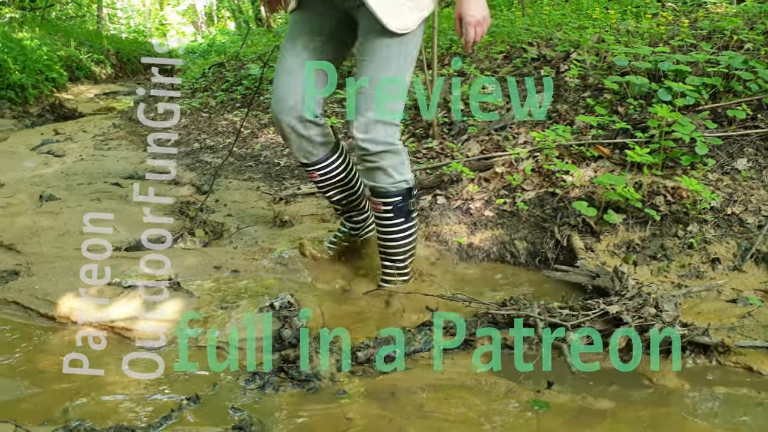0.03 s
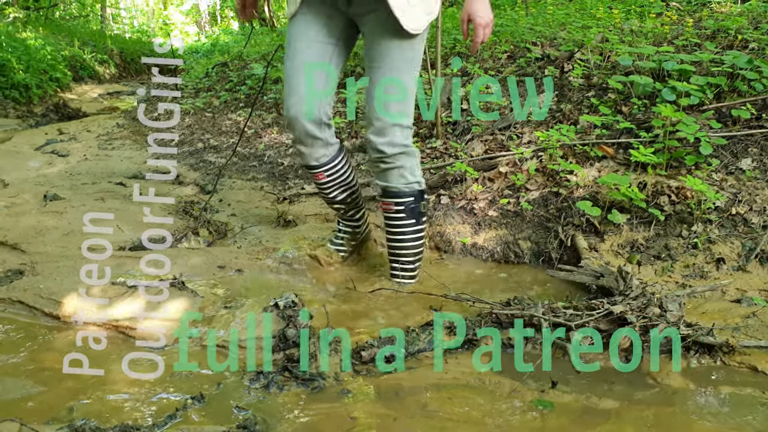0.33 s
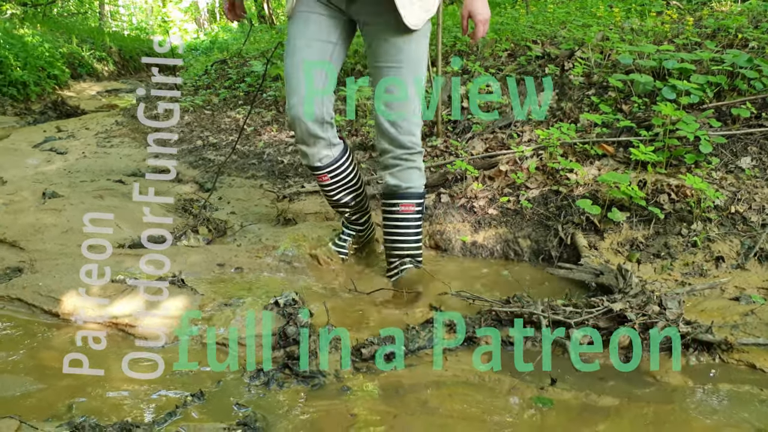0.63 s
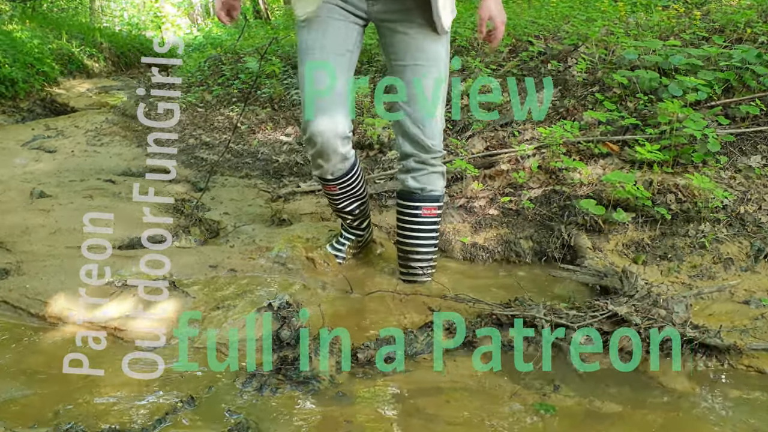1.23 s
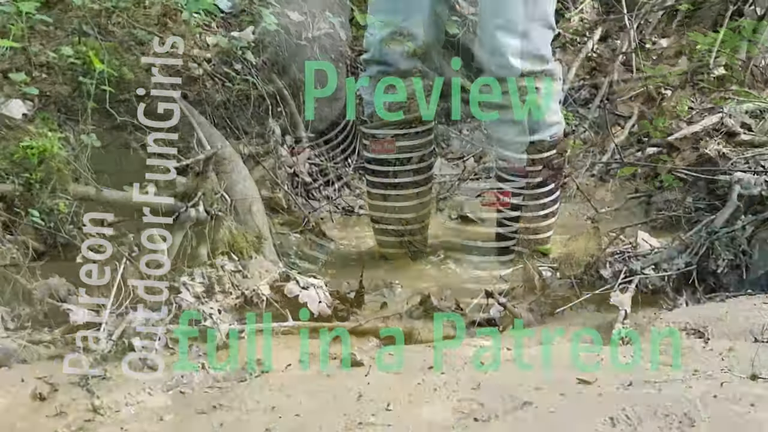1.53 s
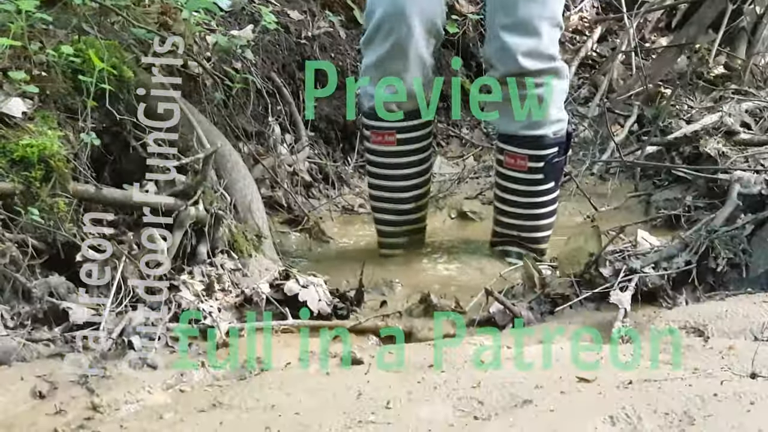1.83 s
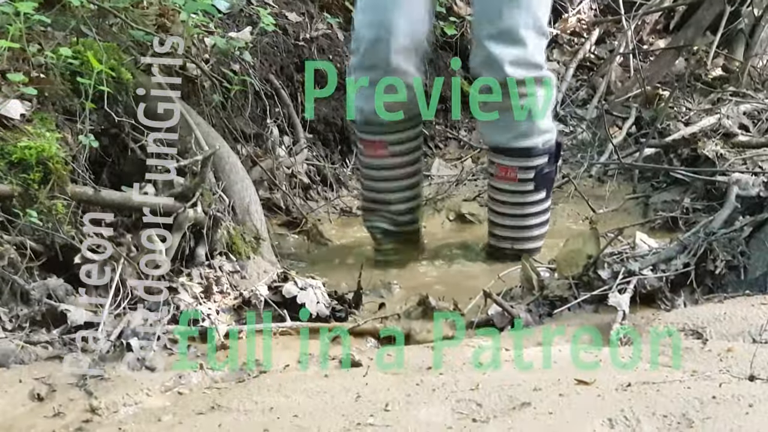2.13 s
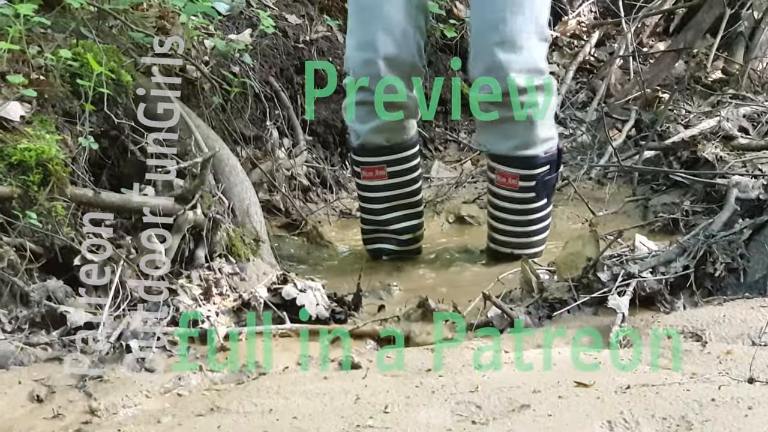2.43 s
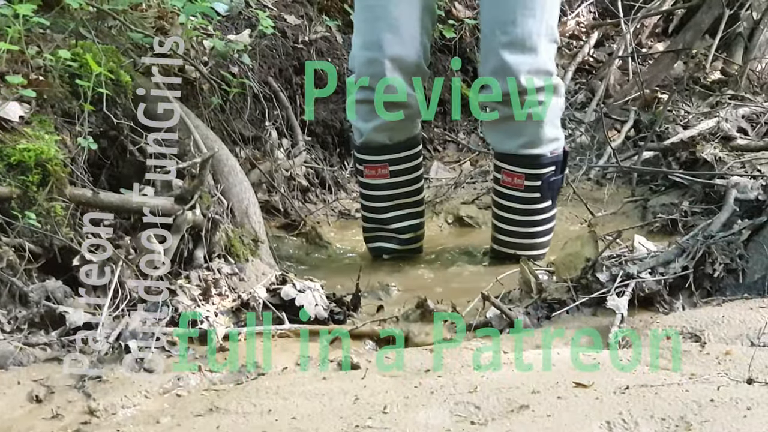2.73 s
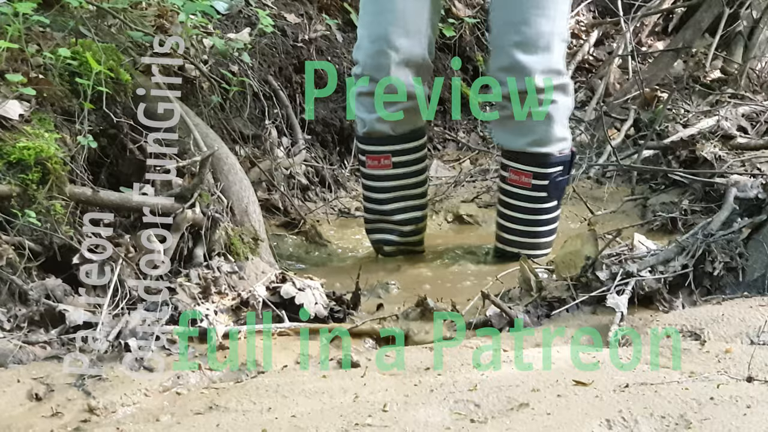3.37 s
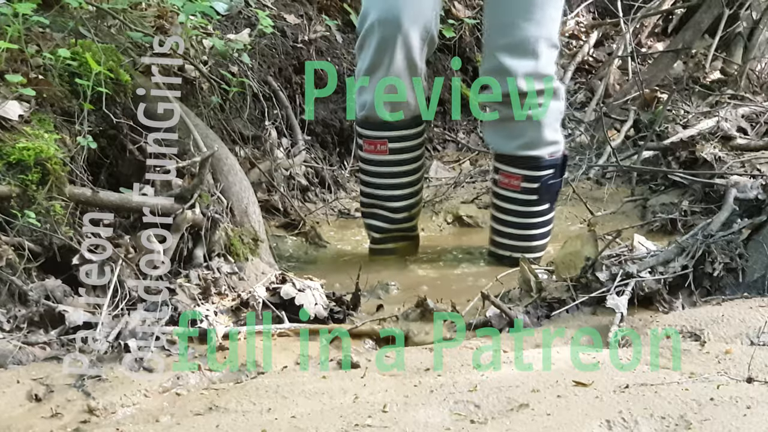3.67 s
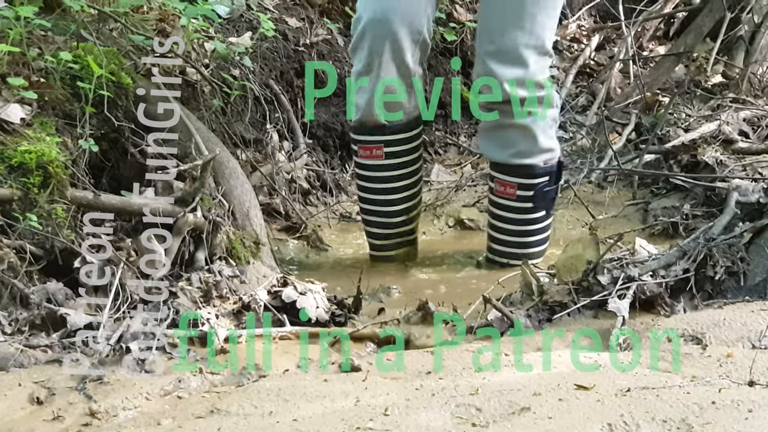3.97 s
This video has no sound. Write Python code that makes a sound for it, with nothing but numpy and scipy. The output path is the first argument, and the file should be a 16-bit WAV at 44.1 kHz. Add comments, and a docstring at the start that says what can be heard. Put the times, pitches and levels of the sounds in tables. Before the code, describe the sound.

Small splashes, bubbles and a drip come from boots stirring shallow water nearby on the left, over a distant engine. Halfway through, the sound cuts to a low wash of traffic, with faint birdsong echoing in the woods.

```python
"""Rubber boots shift in a shallow muddy stream, close on the left: small splashes of droplets,
ticks of spray, ringing bubbles and one drip. A far engine drones and sinks in pitch over outdoor rumble.
At 1.6 s a click and a cut lead to a second spot by the stream: distant traffic, a faint trilling bird
blurred by the wood's echo, and a soft low thud."""
import sys
import numpy as np
from scipy import signal
from scipy.fft import rfft, irfft
from scipy.io import wavfile

SR = 44100
rng = np.random.default_rng(int(sys.argv[2]) if len(sys.argv) > 2 else 0)


def unload_audio(sound):
    """Save the sound as a 16-bit wav file, at the path given as the first command line argument."""
    columns = np.transpose(np.atleast_2d(sound))
    # keep every value between -1 and 1, then stretch to whole-number steps
    steps = np.round(np.clip(columns, -1, 1) * 32767)
    wavfile.write(sys.argv[1], SR, steps.astype(np.int16))


N = 176400
T, FREQ = np.arange(N) / SR, np.maximum(np.arange(N // 2 + 1) * SR / N, 1)


def undb(db):
    """Decibels to gain."""
    return 10 ** (np.asarray(db) / 20)


def curve(rows, column=1):
    """One table column, linear in time."""
    rows = np.array(rows)
    return np.interp(T, rows[:, 0], rows[:, column])


def over_hz(rows):
    """Table columns interpolated over log frequency."""
    rows = np.array(rows, float)
    return [np.interp(np.log(FREQ), np.log(rows[:, 0]), col) for col in rows.T[1:]]


def band(hz, width_oct):
    """Gaussian band gain over log frequency."""
    return np.exp(-.5 * (np.log2(FREQ / hz) / width_oct) ** 2)


def unit(x):
    """Scale to rms 1."""
    return x / (np.std(x) + 1e-12)


def walk(rate_hz):
    """Smooth random drift, rms 1."""
    return unit(irfft(rfft(rng.standard_normal(N)) * np.exp(-(FREQ / rate_hz) ** 2), N))


def place(x, pan_db):
    """Pan by left minus right dB; the nearer channel keeps the level."""
    return x * undb([[min(pan_db, 0)], [min(-pan_db, 0)]])


def bass_place(x, pan_db=7):
    """Low sound: in phase on both sides, stronger on the left."""
    gains = undb([[pan_db], [0]])
    return x * gains / gains.mean()


def field(rows):
    """Diffuse, partly coherent stereo noise. Each row: Hz, left and right density in dB re 1/Hz."""
    # Each row: frequency in Hz, left-right coherence 0-1, lag of the left in radians.
    coherence = [(60, 0.77, -0.24), (250, 0.87, -0.63), (600, 0.46, 0.56), (880, .15, 1), (1100, 0.2, 3),
                 (1330, 0.46, 3.5), (2000, 0, 0.5), (4000, 0.4, 18)]
    alike, lag = over_hz(coherence)
    left_db, right_db = over_hz(rows)
    left, independent = rfft(rng.standard_normal((2, N))) * np.sqrt(SR / 2)
    right = alike * np.exp(1j * lag) * left + np.sqrt(1 - alike ** 2) * independent
    return irfft(np.array([left * undb(left_db), right * undb(right_db)]), N)


def ring(start_s, hz, ring_s, glide_per_s=1.1):
    """Damped tone that peaks after ring_s and may glide up."""
    age = np.maximum(T - start_s, 0)
    envelope = age / ring_s * np.exp(1 - age / ring_s)
    return envelope * np.sin(2 * np.pi * hz * age * (1 + glide_per_s * age / 2))


def tick(start_s, db, hz, width_oct, decay_s, pan_db):
    """Short noise burst in one band."""
    burst = rng.standard_normal(N) * (T >= start_s) * np.exp(-np.clip((T - start_s) / decay_s, 0, 50))
    burst = irfft(rfft(burst) * band(hz, width_oct), N)
    return place(burst / np.abs(burst).max() * undb(db), pan_db)


def echo(x, t60_s):
    """Diffuse tail of unit energy, different on each side."""
    tail = rng.standard_normal((2, N)) * undb(-60 * T / t60_s)
    tail /= np.sqrt(np.sum(tail ** 2, axis=1, keepdims=True))
    return signal.fftconvolve(np.broadcast_to(x, (2, N)), tail, axes=1)[:, :N]


def hiss():
    """Faint steady treble hiss."""
    # Each row: frequency in Hz, left and right density in dB.
    density = [(2000, -125, -125), (5840, -122, -124), (7500, -132, -132), (9300, -130, -130),
               (11500, -120, -120.5), (15500, -119, -119.5)]
    return field(density)


def rumble():
    """Outdoor rumble; the rush above about 250 Hz dies down."""
    # Each row: frequency in Hz, left and right density in dB.
    density = [(20, -86, -84.5), (32, -71.5, -77.5), (48, -56, -62), (70, -53.5, -62), (118, -58, -65),
               (212, -65, -73), (296, -73.5, -81), (450, -70, -79), (606, -69, -78), (950, -70.5, -80),
               (1395, -75.5, -83), (1880, -80.5, -88.5), (2640, -90, -100), (3650, -97.5, -117),
               (4970, -113, -128), (7000, -128, -138)]
    # Each row: time in seconds, gain of the rush in dB.
    rush_db = [(0, 4), (.22, 5), (.4, 1.5), (.6, 1), (.78, 0.5), (1.0, 1), (1.3, -0.5), (1.6, -0.5)]
    air = field(density)
    bass = irfft(rfft(air) / (1 + (FREQ / 250) ** 4), N)
    return bass + (air - bass) * undb(curve(rush_db) + .98 * walk(8.2))


def traffic():
    """Distant traffic: a gently wavering wash of noise."""
    # Each row: frequency in Hz, left and right density in dB.
    density = [(20.1, -83, -90), (32, -83, -86), (47.4, -59.5, -63.5), (69.4, -55, -63), (105.5, -64, -71),
               (171, -71, -79.5), (340, -80.5, -90), (504, -77.5, -90), (683, -74, -83.5),
               (930, -67.5, -76), (1412, -74.5, -80.5), (1917, -82, -91), (2580, -92, -104),
               (3420, -107, -119), (4700, -117, -130), (6780, -130, -140)]
    return field(density) * undb(.5 * walk(5.9))


def rustle():
    """Thin steady noise of leaves and water."""
    # Each row: frequency in Hz, left and right density in dB.
    density = [(2500, -126, -138), (3800, -116, -132), (4730, -115, -132), (6040, -111, -127),
               (6700, -128, -140)]
    return field(density)


def drones(fade_s=.1, waver_db=3):
    """Wavering tones that come and go within the rumble."""
    # Each row: start and end in seconds, pitch in Hz, level in dB.
    tones = [(-.1, 0.452, 50.5, -43), (-.1, 0.86, 76.5, -40.5), (0, .38, 408.6, -53),
             (.95, 1.67, 80.95, -36), (1.173, 1.692, 392.5, -51.5), (1.9, 2.95, 83.9, -44.5),
             (2.703, 3.45, 59, -45)]
    total = 0
    for start_s, end_s, hz, db in tones:
        fade = np.clip(np.minimum(T - start_s, end_s - T) / fade_s, 0, 1)
        gain = fade * undb(db + waver_db * walk(6.6))
        phase = 2 * np.pi * np.cumsum(hz * (1 + .01 * walk(4.85))) / SR
        total += gain * np.sqrt(2) * np.sin(phase)
    return bass_place(total)


def engine():
    """Harmonics of a far engine, each fading on its own way through the air."""
    # Each row: time in seconds, firing rate in Hz.
    firing_hz = [(0, 51.24), (.35, 50.9), (.6, 50.06), (.8, 49.0), (1.0, 48.9), (1.3, 48.0), (1.6, 47.18)]
    # Each row: time in seconds, levels of harmonics 2 to 6 in dB.
    harmonic_db = [(0, -32, -41, -51, -63, -66), (.2, -30, -48, -49.5, -60, -59),
                   (.42, -28.5, -56, -49, -56, -63), (.78, -32, -42, -46, -56.5, -67),
                   (.87, -37, -34.5, -44.5, -52, -64.5), (1.12, -31, -35, -57.5, -52.5, -60.5),
                   (1.35, -37, -39.5, -45, -48, -51), (1.6, -33.5, -37, -53, -47, -59)]
    phase = 2 * np.pi * np.cumsum(curve(firing_hz) * (1 + .004 * walk(12))) / SR
    total = 0
    for order in range(2, 7):
        gain = undb(curve(harmonic_db, column=order - 1) + 1.08 * walk(8.8))
        total += gain * np.sqrt(2) * np.sin(order * phase + rng.uniform(0, 2 * np.pi))
    return bass_place(total)


def thud():
    """One soft, low, damped knock."""
    return bass_place(undb(-29.5) * ring(start_s=3.048, hz=77, ring_s=.012, glide_per_s=0))


def whistle(start_s, length_s, top_hz, bottom_hz, db, warble_hz=0):
    """One falling bird note."""
    progress = np.clip((T - start_s) / length_s, 0, 1)
    envelope = np.abs(np.sin(np.pi * progress)) ** .29
    hz = top_hz + (bottom_hz - top_hz) * progress + warble_hz
    return undb(db) * np.sqrt(2) * envelope * np.sin(2 * np.pi * np.cumsum(hz) / SR)


def birds(trill_s=1.935, notes=12, step_s=.083, note_s=.057, jitter_s=.003, scatter_db=1.3):
    """A trill and warbled far calls, heard mostly as echo among the trees."""
    # Course of the trill. Each row: time in seconds, top and bottom pitch in Hz, level in dB.
    course = [(1.94, 6100, 5350, -73), (2.1, 6170, 4730, -68), (2.5, 6200, 4740, -68),
              (2.62, 6150, 4360, -63), (2.78, 6140, 4540, -65), (2.86, 6350, 4400, -70)]
    # Each row: start and length in seconds, top and bottom pitch in Hz, level in dB.
    far_calls = [(1.62, .12, 6000, 5550, -75), (1.78, 0.094, 6150, 5500, -81.5),
                 (2.483, .14, 4100, 3600, -73), (3.076, 0.16, 6280, 5200, -76.5),
                 (3.29, 0.1, 5910, 5500, -73), (3.41, 0.071, 5950, 5550, -72),
                 (3.655, .12, 5800, 4500, -73.5), (3.8, 0.088, 6200, 5500, -76)]
    times_s, *columns = np.array(course).T
    trill = 0
    for i, (timing, strength) in enumerate(rng.standard_normal((notes, 2))):
        start_s = trill_s + step_s * i + jitter_s * timing
        top_hz, bottom_hz, db = (np.interp(start_s, times_s, col) for col in columns)
        trill += whistle(start_s, note_s, top_hz, bottom_hz, db + scatter_db * strength)
    warble_hz = 200 * walk(90)
    far = sum(whistle(*row, warble_hz) for row in far_calls)
    return place(undb(-6) * trill + echo(trill + far, t60_s=1), pan_db=22)


def drip():
    """One clear drop rings with two faint overtones."""
    # Each row: pitch in Hz, peak in dB, pan in dB.
    partials = [(3890, -39, 22), (7700, -72, 15), (11460, -65, -5)]
    return sum(place(undb(db) * ring(start_s=1.302, hz=hz, ring_s=.0019), pan_db)
               for hz, db, pan_db in partials)


def bubbles():
    """Small air pockets ring as drops fall back."""
    # Each row: start in seconds, peak in dB, pitch in Hz, ring time in seconds, pan in dB.
    pockets = [(.153, -48.5, 3580, 0.0015, 20), (.328, -48.5, 2400, .002, 15),
               (.664, -39, 3000, 0.0011, 21), (0.846, -46, 3430, 0.0015, 21),
               (.914, -57.5, 4400, .0016, 18), (1.152, -52, 2820, .003, 18)]
    return sum(place(undb(db) * ring(start_s, hz, ring_s), pan_db)
               for start_s, db, hz, ring_s, pan_db in pockets)


def mud_ticks():
    """Sharp ticks of mud and spray."""
    # Each row: start in seconds, peak in dB, centre in Hz, width in octaves, decay in seconds, pan in dB.
    ticks = [(.012, -30.5, 4600, 0.85, 0.0017, 26), (.048, -44, 5470, 0.17, .003, 25),
             (0.0657, -39, 5500, 1.1, .0015, 23), (.082, -56, 13000, .4, .004, -3),
             (.132, -54.5, 8500, .5, .004, 23), (0.23, -43, 3600, 0.42, 0.00065, 9),
             (.248, -42, 13000, .35, .0012, -10), (0.2483, -51.5, 4860, .25, .002, 3),
             (.283, -46, 5200, 0.24, .003, 18), (.398, -59.5, 9100, 0.81, 0.0048, -3.5),
             (.693, -47, 3800, 0.51, 0.0033, 19), (.736, -42, 4000, 0.53, .004, 21),
             (.761, -34.5, 6513, 0.6, .003, 22), (.863, -43, 4300, 0.36, .002, 21),
             (.872, -51, 5500, .9, .0015, 17)]
    return sum(tick(*row) for row in ticks)


def fizz(decay_s=.31):
    """Fine fizz dying away after the first slosh."""
    # Each row: frequency in Hz, initial left and right density in dB.
    density = [(3000, -115, -125), (5800, -104, -122), (7500, -124, -130), (9500, -119, -121),
               (10900, -111, -107), (15500, -114, -110)]
    return field(density) * np.exp(-T / decay_s)


def droplets(bands=12, band_drops_per_s=260, spread_db=3.2, mist_db=-3.5):
    """Drops of many sizes, each ringing a few cycles, in a fine mist; rms 1."""
    # Spray spectrum. Each row: frequency in Hz, relative level in dB.
    colour = [(1200, -10), (2700, 2.5), (4000, -1), (5800, -5), (7500, -15.5), (10500, -14), (15500, -24)]
    spectrum = 0
    for hz in np.geomspace(colour[0][0], colour[-1][0], bands):
        hits = rng.random(N) < band_drops_per_s / SR
        gains = undb(spread_db * np.minimum(rng.exponential(size=N), 3))
        signs = rng.choice([-1, 1], (2, N))
        spectrum += rfft(hits * gains * signs) * band(hz, width_oct=.18)
    spray = unit(irfft(spectrum, N)) + undb(mist_db) * rng.standard_normal((2, N))
    return unit(irfft(rfft(spray) * undb(over_hz(colour)[0]), N))


def sloshes():
    """Droplets swell and ebb each time a boot pushes water aside."""
    # Each row: peak time, rise and fall in seconds, level in dB, pan in dB.
    moves = [(.02, 0.035, 0.15, -58.5, 18), (.27, .06, 0.1, -66, 5), (.70, .035, .04, -57, 23),
             (.76, 0.044, 0.094, -52, 19.5), (.86, .02, 0.06, -58, 16), (1.12, 0.09, .2, -71.5, 12)]
    power = 0
    for peak_s, rise_s, fall_s, db, pan_db in moves:
        envelope = np.exp(np.minimum((T - peak_s) / rise_s, (peak_s - T) / fall_s))
        power += place(undb(db) * envelope, pan_db) ** 2
    return droplets() * np.sqrt(power)


def boots():
    """Water and mud stirred by the boots, with a short echo from the bank."""
    splashes = sloshes() + fizz() + mud_ticks() + bubbles() + drip()
    return splashes + undb(-14.5) * echo(splashes, t60_s=.16)


def scene():
    """Two spots joined by a 6 ms crossfade and a click; drones and hiss span both."""
    cut_s = 1.612
    blend = np.clip((T - cut_s) / .006 + .5, 0, 1)
    first_spot = engine() + rumble() + boots()
    second_spot = traffic() + rustle() + birds() + thud()
    click = tick(cut_s, db=-42, hz=4500, width_oct=1.4, decay_s=.0004, pan_db=7)
    return (1 - blend) * first_spot + blend * second_spot + drones() + click + hiss()


def record(dry):
    """Steep low-pass at 15.8 kHz."""
    return signal.sosfilt(signal.ellip(10, .2, 70, 15800, fs=SR, output="sos"), dry)


dry = scene()
out = record(dry)
unload_audio(out)
```